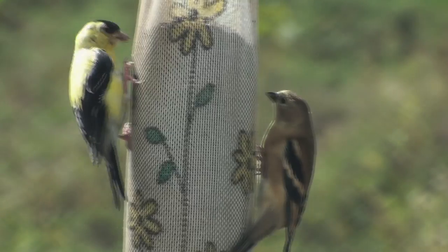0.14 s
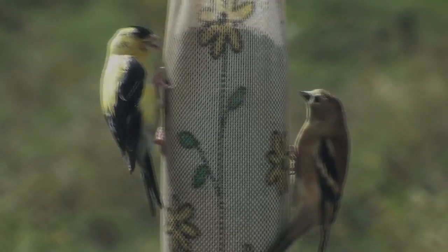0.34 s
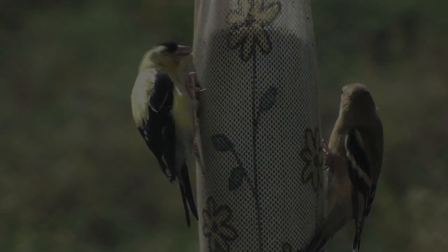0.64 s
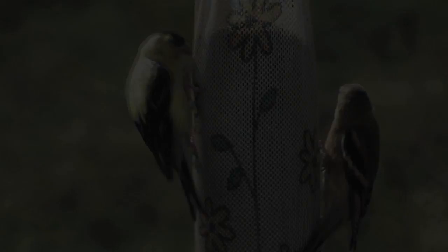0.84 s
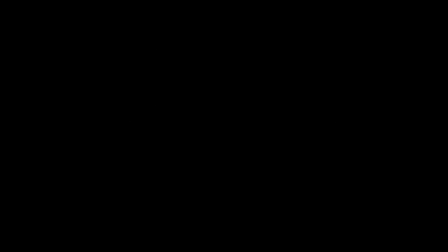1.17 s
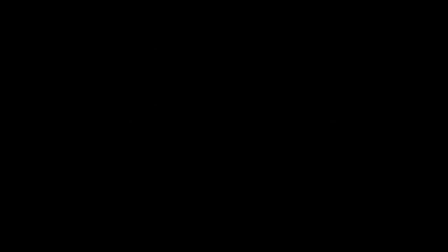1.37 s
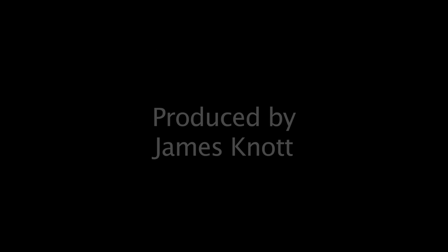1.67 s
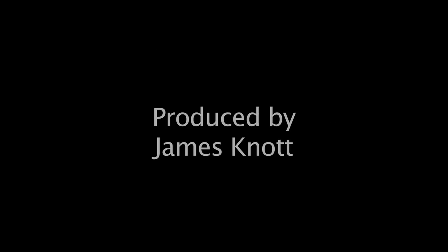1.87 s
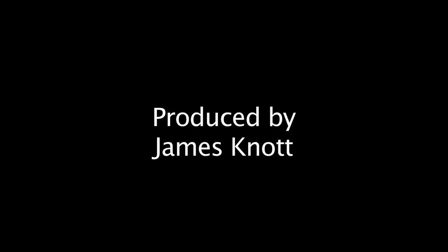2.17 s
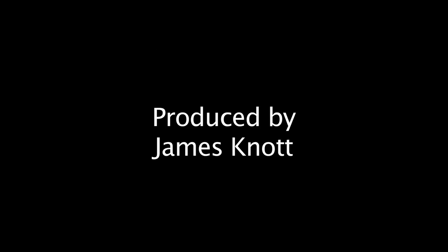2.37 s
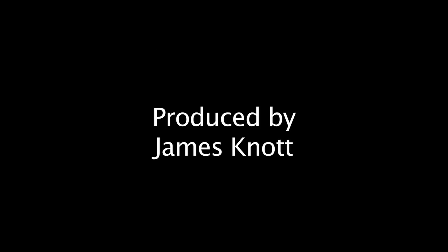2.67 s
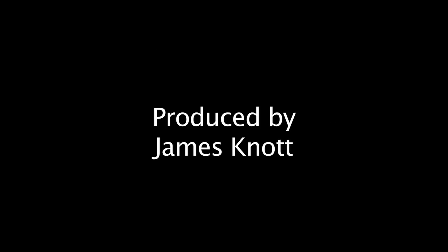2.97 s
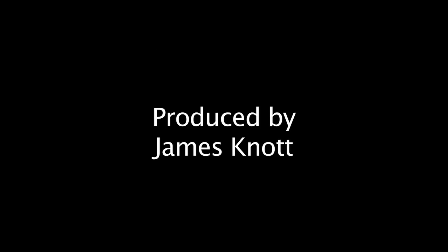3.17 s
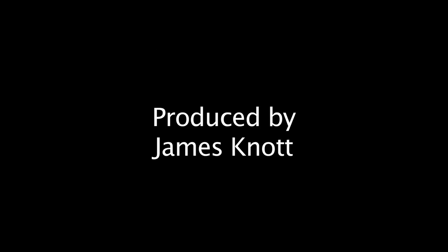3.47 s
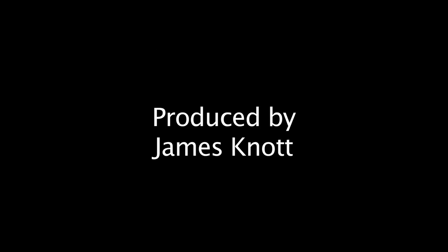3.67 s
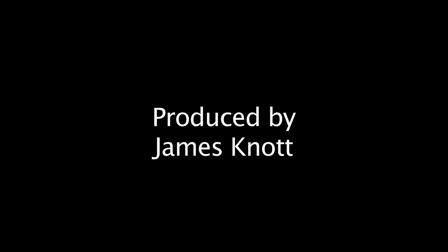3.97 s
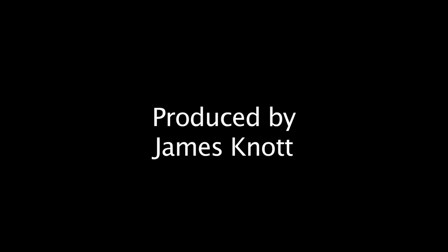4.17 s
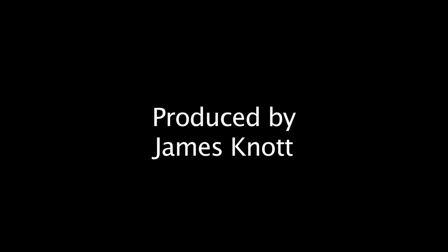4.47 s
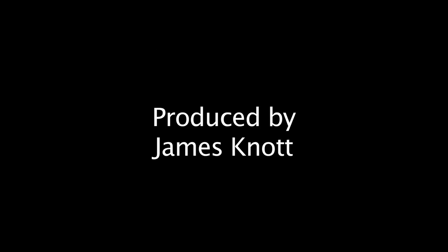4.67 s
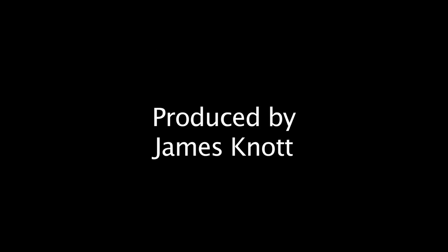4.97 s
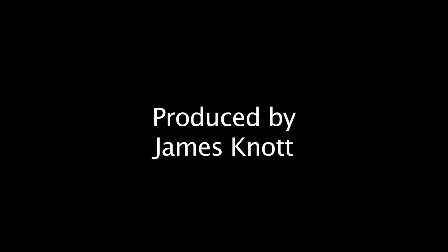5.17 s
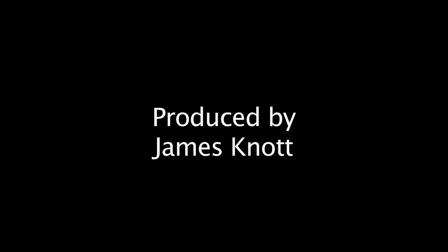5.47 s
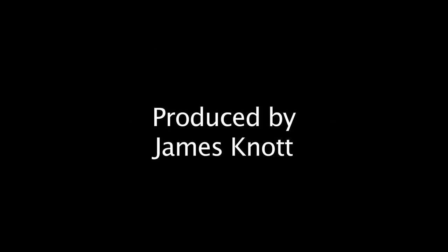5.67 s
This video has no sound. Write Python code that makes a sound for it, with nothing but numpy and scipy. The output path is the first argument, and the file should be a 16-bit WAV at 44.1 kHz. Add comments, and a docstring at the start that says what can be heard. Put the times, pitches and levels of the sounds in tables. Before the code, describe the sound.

Low gusts of wind rumble on the microphone outdoors and soon ease, leaving high cricket trills, joined by a lower group. Midway, a nearby finch gives two quick clear chirps, one falling and one rising, among faint calls from distant birds. Light handling knocks and one short rub come from the camera, and a faint hiss lies underneath.

```python
"""A late-summer garden. Ground crickets trill, scraper on wing file, over a far chorus; a lower group joins.
Wind eddies buffet the microphone at first and die away, over a faint hiss and whine.
Light knocks and one rub ring the hollow camera body. A finch at a feeder gives a few two-voiced
chirps, one tone from each side of its syrinx, with softer notes from birds farther off."""
import sys
import numpy as np
from scipy import signal
from scipy.fft import rfft, irfft
from scipy.io import wavfile
from scipy.ndimage import uniform_filter1d, map_coordinates

SR = 44100
rng = np.random.default_rng(int(sys.argv[2]) if len(sys.argv) > 2 else 0)


def log_audio(samples):
    """Write samples as a 16-bit WAV file to the path given in sys.argv[1]."""
    # one column per channel
    frames = np.atleast_2d(samples).T
    # limit to full scale, then quantise
    limited = np.clip(frames, -1, 1)
    pcm = np.round(limited * 32767).astype(np.int16)
    wavfile.write(sys.argv[1], SR, pcm)


N = 256662
T = np.arange(N) / SR


def amp(db):
    return 10 ** (np.asarray(db) / 20)


def unit_rms(x):
    return x / np.sqrt(np.mean(x ** 2) + 1e-20)


def add(mix, start_s, sound):
    part = mix[max(round(start_s * SR), 0):][:len(sound)]
    part += sound[:len(part)]


def lowpass(x, cutoff_hz):
    return signal.sosfilt(signal.butter(4, cutoff_hz, fs=SR, output="sos"), x)


def noise(spectrum):
    """Unit-RMS noise shaped by (Hz, dB) points."""
    hz, db = np.transpose(spectrum)
    colour = amp(np.interp(np.log(np.fft.rfftfreq(N, 1 / SR) + 1), np.log(hz), db))
    return unit_rms(irfft(rfft(rng.standard_normal(N)) * colour, N))


def wander(rate_hz, size):
    """Smooth random motion of about unit size."""
    knots = rng.standard_normal(int(size / SR * rate_hz * 2) + 4)
    return map_coordinates(knots, [1 + np.arange(size) / SR * rate_hz * 2], order=3, mode="nearest")


def swell(start_s, end_s, attack_s, release_s):
    """Linear attack, hold and release."""
    return np.clip(np.minimum((T - start_s) / attack_s, (end_s - T) / release_s), 0, 1)


def garden_scatter(x, t60_s, echoes_per_s=2000):
    """Leaves and walls scatter a short, thin tail."""
    t = np.arange(SR // 2) / SR
    taps = rng.standard_normal(len(t)) * (rng.random(len(t)) < echoes_per_s / SR)
    taps *= (t > .003) * amp(-60 * t / t60_s)
    return signal.fftconvolve(x, taps / np.linalg.norm(taps))[:N]


def wing_stroke(top_hz, length_s, sag_hz, crest=.36, jitter_hz=45):
    """The scraper speeds up, then slows along the file, so the pitch arches and sags."""
    progress = np.linspace(0, 1, int(length_s * SR))
    hz = top_hz - sag_hz * abs((progress - crest) / (1 - crest)) ** 1.6
    hz += jitter_hz * wander(350, len(progress))
    pressure = np.interp(progress, [0, .1, .35, .52, .75, .92, 1], [0, .4, 1, .85, .45, .26, 0])
    return pressure * np.sin(2 * np.pi * (np.cumsum(hz) / SR + rng.random()))


# Runs of wing strokes. Each row: start in seconds, end in seconds, strokes per second, stroke length
# in seconds, top pitch in Hz, sag in Hz, relative level in dB, fade-out in seconds.
TRILLS = [(-.435, 1.75, 17.83, .029, 8700, 1400, -42, .55),
          (-.411, 1.75, 17.83, .028, 8730, 1500, -42, .82),
          (-.410, 1.70, 18.05, .026, 8060, 1050, -44.5, .56),
          (1.412, 5.82, 17.18, .026, 8250, 1200, -49.5, .01),
          (1.460, 5.82, 16.98, .022, 7810, 900, -49.5, .01),
          (1.123, 4.0, 18.7, .028, 6630, 850, -45.5, .05),
          (1.071, 5.82, 11.11, .041, 5960, 950, -49.5, .01),
          (1.076, 5.82, 11.22, .038, 6630, 720, -48.5, .01),
          (5.033, 5.82, 18.9, .028, 6330, 600, -49.5, .01)]


def cricket_trills(fade_in_s=.3, uneven_db=1.6, detune_hz=30, sag_spread=.1, jitter_s=.001):
    """Each cricket repeats its stroke at a steady rate, never twice quite alike."""
    out = np.zeros(N)
    for start_s, end_s, rate_hz, length_s, top_hz, sag_hz, db, fade_out_s in TRILLS:
        times = np.arange(start_s, end_s, 1 / rate_hz)
        for at_s in times[times > 0]:
            fade = np.clip((at_s - start_s + 1 / rate_hz) / fade_in_s, 0, 1)
            fade *= np.clip((end_s - at_s) / fade_out_s, 0, 1)
            force, pitch, sag, late = rng.standard_normal(4)
            stroke = wing_stroke(top_hz + detune_hz * pitch, length_s, sag_hz * (1 + sag_spread * sag))
            add(out, at_s + jitter_s * late, fade * amp(db + uneven_db * force) * stroke)
    return out


# Spectra of two far cricket groups. Each row: frequency in Hz, relative density in dB.
HIGH_GROUP_SPECTRUM = [(6500, -54), (7200, -12), (7900, -2.5), (8300, -4.5), (8650, 2.5), (9000, -11),
                       (9600, -24), (10300, -66)]
LOW_GROUP_SPECTRUM = [(6400, -47), (7100, -12), (7600, -1), (8250, -1), (8600, -3.5), (9000, -15),
                      (9600, -24), (10300, -54)]
# Group levels. Each row: time in seconds, high group in dB, low group in dB.
CHORUS_LEVELS = [(0, -52, -76), (1.15, -53, -56.5), (1.5, -55, -54.5), (1.8, -66, -53.5), (3.5, -82, -53.5),
                 (5.82, -82, -56.5)]


def cricket_chorus(flicker_db=1.0, throb_hz=14.0, throb_depth=.055):
    """Many far crickets blur into throbbing bands."""
    times, high_db, low_db = np.transpose(CHORUS_LEVELS)
    high = amp(np.interp(T, times, high_db)) * noise(HIGH_GROUP_SPECTRUM)
    low = amp(np.interp(T, times, low_db)) * noise(LOW_GROUP_SPECTRUM)
    throb = 1 + throb_depth * np.cos(2 * np.pi * throb_hz * T)
    return (high + low) * amp(flicker_db * wander(35, N)) * throb


# Tree cricket songs. Each row: start in seconds, end in seconds, pitch in Hz, half-width in Hz,
# level in dB, pulses per second. A row that starts after its end is silent.
TREE_CRICKETS = [(-1.5, 1.74, 4130, 720, -64, 51), (3.5, 7, 3660, 250, -71, 57),
                 (7.5, 7, 4700, 160, -72, 42)]


def tree_crickets(pulse_depth=.18):
    """Far tree crickets merge into narrow, pulsing bands of noise."""
    out = np.zeros(N)
    for start_s, end_s, hz, width_hz, db, pulse_hz in TREE_CRICKETS:
        band = noise([(hz - 2 * width_hz, -50), (hz - width_hz, -12), (hz, 0),
                      (hz + width_hz, -12), (hz + 2 * width_hz, -50)])
        pulsing = 1 + pulse_depth * np.sin(2 * np.pi * pulse_hz * T)
        out += amp(db) * swell(start_s, end_s, .58, .46) * band * pulsing
    return out


# Breeze strength. Each row: time in seconds, relative level in dB.
BREEZE = [(1.17, -42.5), (1.64, -47.5), (1.74, -56), (1.75, -48.5), (1.96, -41.5), (2.39, -59.5),
          (2.62, -43), (2.65, -53.5), (3.0, -61.5), (3.24, -43), (3.33, -53), (3.55, -48.5), (3.66, -63),
          (3.84, -42.5), (3.86, -53), (4.07, -55), (4.21, -71), (4.93, -57.5), (5.75, -67.5), (5.82, -58)]
# Single eddies hitting the microphone. Each row: start in seconds, length in seconds, relative level in dB.
THUMPS = [(0.098, 0.097, -32), (0.245, 0.055, -29), (0.348, 0.11, -32), (0.484, 0.069, -33),
          (0.562, 0.044, -32.5), (0.62, 0.15, -30), (0.884, 0.068, -33), (0.962, 0.059, -34.5),
          (1.087, 0.059, -31)]
# Wind rumble. Each row: frequency in Hz, relative density in dB.
RUMBLE_SPECTRUM = [(10, -23), (30, -9.5), (65, 1.5), (120, -3), (200, -13.5), (400, -21), (800, -33.5),
                   (2000, -44.5), (5000, -57)]


def wind(breeze_db=-.5, flutter_db=2.0, flutter_hz=11, thump_db=-1, edge_s=.029,
         eddy_db=-48, eddy_growth=1.04, sway_db=-3, sway_limit_db=-42):
    """Wind rumbles on the microphone: light air mostly sways it, strong gusts shed many small eddies."""
    force = amp(np.interp(T, *np.transpose(BREEZE)) + breeze_db + flutter_db * wander(flutter_hz, N))
    for start_s, length_s, db in THUMPS:
        thump = swell(start_s - edge_s / 2, start_s + length_s + edge_s / 2, edge_s, edge_s)
        force = np.hypot(force, amp(db + thump_db) * thump)
    strength_db = 20 * np.log10(force) + 32
    rumble = noise(RUMBLE_SPECTRUM)
    rumble /= np.sqrt(uniform_filter1d(rumble ** 2, size=3000))  # the gust alone sets the slow level
    eddies = noise([(80, -4), (200, 3.5), (400, -14.5), (800, -14.5), (2000, -88), (5000, -65)])
    eddies *= amp(eddy_db + eddy_growth * strength_db)
    sway = noise([(10, -16), (25, 0), (50, 4.0), (80, -18), (200, -64)])
    sway *= amp(sway_db) * force / np.hypot(1, force / amp(sway_limit_db))
    return force * rumble + eddies + sway


# Background air. Each row: frequency in Hz, relative density in dB.
AIR_SPECTRUM = [(20, -0.5), (120, -1.5), (200, -11), (400, -5.5), (800, -7.5), (1300, -11.5), (2400, -15.5),
                (5000, -16), (9500, -18), (12000, -18), (16000, -17.5)]


def air(level_db=-53):
    """A steady, broad hiss."""
    return amp(level_db) * noise(AIR_SPECTRUM)


def whine(pitch_hz=1265, drift_hz=4, level_db=-71.5):
    """A faint, nearly steady tone."""
    hz = pitch_hz + drift_hz * wander(5.5, N)
    return amp(level_db) * np.sin(2 * np.pi * np.cumsum(hz) / SR)


# Buzzy chirps. Each row: start in seconds, length in seconds, top pitch in Hz, level in dB.
BUZZES = [(0.125, 0.062, 9200, -46), (0.338, .07, 9400, -55), (0.838, 0.061, 9140, -44),
          (.972, .05, 9550, -57), (1.208, 0.051, 9140, -45), (1.28, .07, 9450, -56)]


def cricket_buzzes(stroke_rate_hz=122):
    """Brief chirps of very fast wing strokes."""
    out = np.zeros(N)
    for start_s, length_s, top_hz, db in BUZZES:
        for after_s in np.arange(0, length_s, 1 / stroke_rate_hz):
            arch = np.sin(np.pi * (.11 + .94 * after_s / length_s))
            add(out, start_s + after_s, arch * amp(db) * wing_stroke(top_hz, length_s=.0094, sag_hz=350))
    return out


# Camera body modes. Each row: frequency in Hz, relative level in dB, 60 dB decay time in seconds.
BODY_MODES = [(366, -12.5, 0.074), (499, -3.5, 0.049), (677, 1, 0.019), (781, -3.5, 0.036)]


def body_ring(pitch, rise_s=.0018, uneven_db=2.6):
    """The hollow camera body rings in damped modes, balanced differently at each strike."""
    t = np.arange(SR // 8) / SR
    ring = np.zeros(len(t))
    for hz, db, t60_s in BODY_MODES:
        decay = amp(db + uneven_db * rng.standard_normal() - 60 * t / t60_s)
        ring += decay * np.sin(2 * np.pi * hz * pitch * t)
    return ring * (1 - np.exp(-t / rise_s))


# Knocks on the camera. Each row: start in seconds, relative ring level in dB, ring pitch factor,
# relative tick level in dB.
KNOCKS = [(0.6953, -20.5, 0.89, -19), (2.031, -30, 1, -52), (2.066, -26, 1, -44), (2.092, -29, 0.93, -60),
          (2.432, -29, 0.98, -52), (2.448, -35.5, 0.98, -70), (3.07, -38, 0.97, -70),
          (3.896, -32.5, 0.98, -64), (3.964, -37.5, 0.954, -65), (4.056, -30.5, 1.06, -62),
          (4.182, -37, 1.044, -65), (4.25, -36.5, 1.07, -65), (4.332, -64, 1.0, -36),
          (5.783, -35, 1.4, -60), (5.796, -25.5, 1.05, -30)]


def camera_knocks(tick_hz=3000, tick_decay_s=.000091, dull_hz=1000):
    """A tiny contact tick, then the body's dull ring."""
    ticks, rings = np.zeros(N), np.zeros(N)
    t = np.arange(SR // 8) / SR
    tick = 2 * lowpass(np.exp(-t / tick_decay_s) * np.sin(2 * np.pi * tick_hz * t), 5500)
    for start_s, ring_db, pitch, tick_db in KNOCKS:
        add(rings, start_s, amp(ring_db) * body_ring(pitch))
        add(ticks, start_s, amp(tick_db) * tick)
    return ticks + lowpass(rings, dull_hz)


def syrinx(shape, notes, octave_db=-30, third_db=-45, sum_db=-45, upper_sum_db=-45,
           rasp=.049, waver_hz=14, near_db=-27, near_scatter_db=-21.5, scatter_growth=.45):
    """The two sides of the syrinx sing a tone each; their coupling adds overtones and sum tones."""
    direct, scattered = np.zeros(N), np.zeros(N)
    times, *columns = np.transpose(shape)
    t = np.arange(0, times[-1], 1 / SR)
    low_hz, low_db, high_hz, high_db = (np.interp(t, times, column) for column in columns)
    for start_s, db, pitch, lift_db in notes:
        low_rad = 2 * np.pi * np.cumsum(pitch * low_hz + waver_hz * wander(219, len(t))) / SR
        high_rad = 2 * np.pi * np.cumsum(pitch * high_hz + 3 * waver_hz * wander(202.6, len(t))) / SR
        voices = amp(low_db) * np.sin(low_rad)
        voices += amp(high_db + lift_db) * np.sin(high_rad) * (1 + 3 * rasp * wander(214, len(t)))
        overtones = amp(octave_db) * np.sin(2 * low_rad) + amp(third_db) * np.sin(3 * low_rad)
        overtones += amp(sum_db) * np.sin(low_rad + high_rad)
        overtones += amp(upper_sum_db) * np.sin(2 * low_rad + high_rad)
        note = (voices + amp(.8 * low_db) * overtones) * (1 + rasp * wander(900, len(t)))
        note *= np.sqrt(2) * amp(db) * signal.windows.tukey(len(t), .05)
        add(direct, start_s, note)
        # Softer notes are farther off, so a larger share scatters.
        add(scattered, start_s, amp(near_scatter_db + scatter_growth * (near_db - db)) * note)
    return direct + garden_scatter(scattered, t60_s=.12)


# Note shapes. Each row: time into the note in seconds, low voice base pitch in Hz, its relative level
# in dB, high voice base pitch in Hz, its relative level in dB.
RISING_SHAPE = [(0, 2780, -24, 4350, -45), (.005, 2820, -14, 4380, -38), (.013, 2955, -6, 4425, -26),
                (.025, 3047, -4, 4530, -18), (.048, 3200, 0, 4700, -9), (.068, 3360, -1, 4880, -11),
                (.085, 3440, -2, 4915, -11), (.1, 3470, -6, 5020, -14), (.107, 3655, -10, 5130, -19),
                (.113, 3850, -24, 5300, -36)]
SLUR_SHAPE = [(0, 3465, -8, 4620, -28), (.014, 3383, 4, 4550, -10), (.03, 2910, 0.5, 4120, -4),
              (.045, 2550, 0, 3500, -22), (.062, 2200, -16, 3150, -35)]
WHISTLE_SHAPE = [(0, 3230, -14, 4700, -30), (.02, 3315, -2, 4800, -12), (.07, 3430, 0, 4900, -5),
                 (.1, 3490, -12, 5000, -24)]
FALLING_SHAPE = [(0, 3900, -26, 4900, -42), (.005, 4000, -12, 5150, -28), (.012, 4190, -6, 5830, -13),
                 (.02, 4110, -2, 5790, -7), (.032, 4005, 0, 5650, -3), (.042, 3630, -1, 5250, -5),
                 (.051, 3490, -4, 4960, -8), (.058, 3530, -13, 5040, -14), (.065, 3800, -25, 5300, -32)]
# Notes sung. Each row: start in seconds, relative level in dB, pitch factor, high voice lift in dB.
RISING_NOTES = [(.946, -41.5, 0.99, 4.5), (2.799, -28, 1.0, 2)]
SLURRED_NOTES = [(1.30, -67, 0.75, 0), (1.687, -61.5, 1.38, -10), (2.738, -64, 1.3, -10),
                 (3.048, -63.5, 1.05, -6), (3.192, -60.5, 1.02, 4), (3.312, -63, 0.96, -1),
                 (3.44, -66, 0.73, -2), (3.81, -65, 1.38, -10), (4.18, -61, 0.93, 3), (4.289, -63, 0.92, 6),
                 (5.498, -65, 1.36, -16)]
WHISTLED_NOTES = [(1.825, -63.5, 0.99, -2), (3.97, -65, 1.0, 0), (5.66, -65, 1.0, 0)]
FALLING_NOTES = [(2.665, -31, 1.0, 0)]


def finches():
    """Rising and falling chirps nearby; raspy falling slurs and nearly level whistles farther off."""
    rising = syrinx(RISING_SHAPE, RISING_NOTES,
                    octave_db=-17, third_db=-34, sum_db=-31, upper_sum_db=-33, rasp=.062)
    slurs = syrinx(SLUR_SHAPE, SLURRED_NOTES, rasp=.15, waver_hz=92)
    whistles = syrinx(WHISTLE_SHAPE, WHISTLED_NOTES)
    falling = syrinx(FALLING_SHAPE, FALLING_NOTES,
                     octave_db=-20, third_db=-21, sum_db=-22, upper_sum_db=-35, rasp=.05)
    return rising + slurs + whistles + falling


def camera_rub(level_db=-52, slips_per_s=300, dull_hz=1000):
    """The camera rubs on its mount once; many small slips ring the body."""
    slips = rng.standard_normal(N) * (rng.random(N) < slips_per_s / SR)
    ringing = unit_rms(signal.fftconvolve(slips, body_ring(pitch=.88))[:N])
    envelope = swell(start_s=3.82, end_s=4.3, attack_s=.077, release_s=.07)
    return lowpass(amp(level_db) * envelope * ringing, dull_hz)


def scene():
    """All sources at one microphone, the same in both channels."""
    crickets = amp(-.22) * cricket_trills() + cricket_buzzes()
    mono = crickets + amp(-8.5) * garden_scatter(crickets, t60_s=.11)
    mono += cricket_chorus() + tree_crickets() + wind() + air() + whine()
    mono += camera_knocks() + finches() + camera_rub()
    return np.array([mono, mono])


def record(dry, cutoff_hz=15800):
    """A steep band limit on the top treble."""
    taps = signal.firwin(511, cutoff_hz, window=("kaiser", 9), fs=SR)
    return signal.oaconvolve(dry, taps[None], "same")


dry = scene()
out = record(dry)
log_audio(out)
```